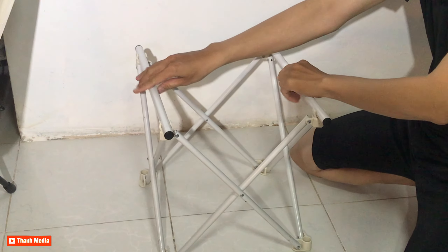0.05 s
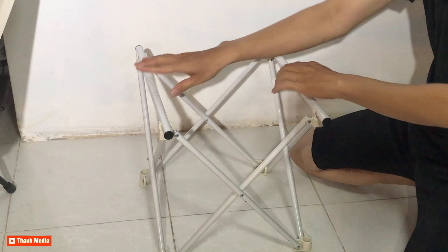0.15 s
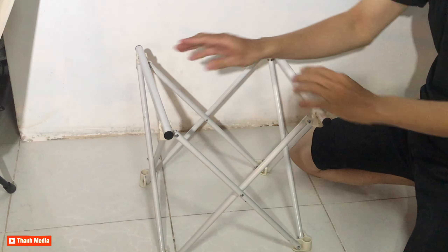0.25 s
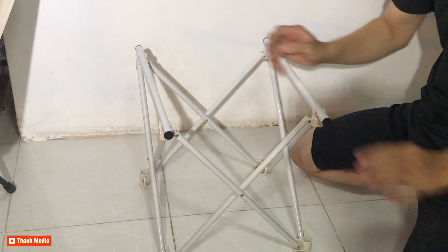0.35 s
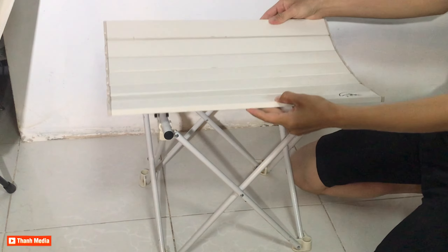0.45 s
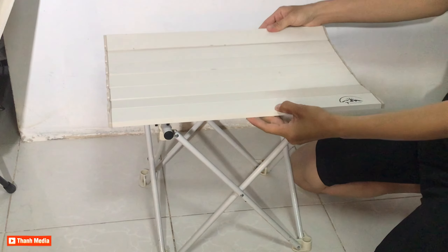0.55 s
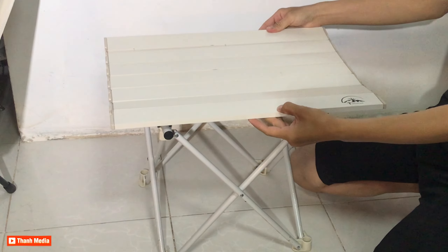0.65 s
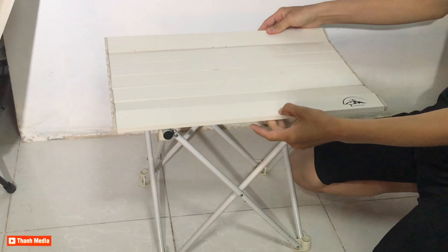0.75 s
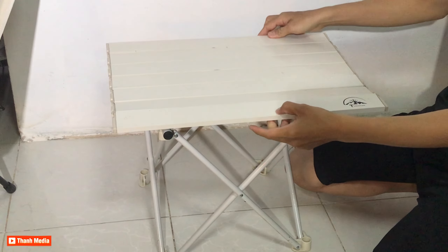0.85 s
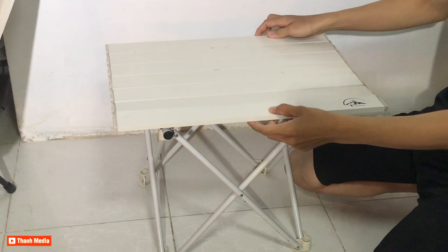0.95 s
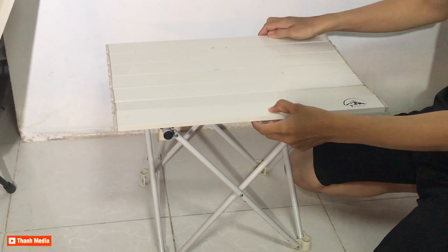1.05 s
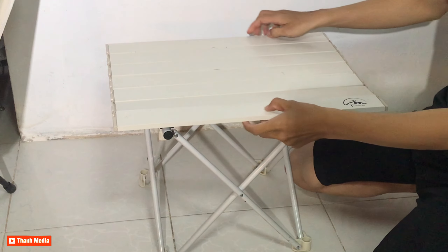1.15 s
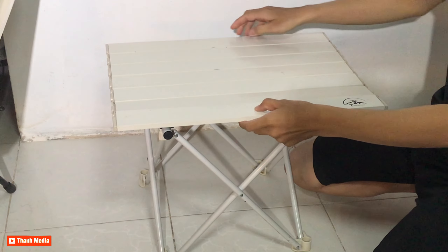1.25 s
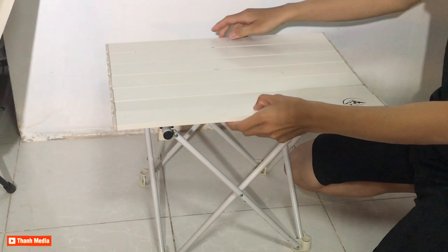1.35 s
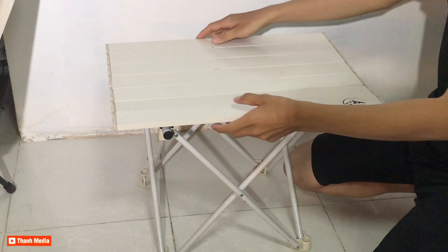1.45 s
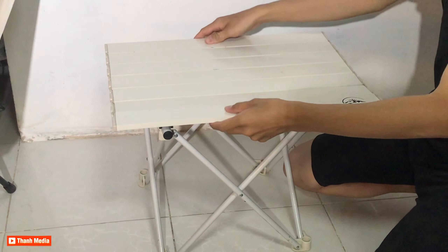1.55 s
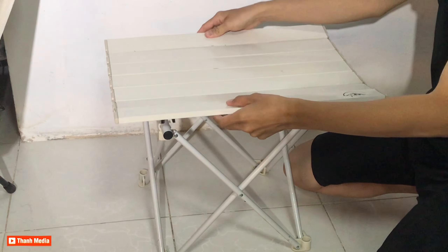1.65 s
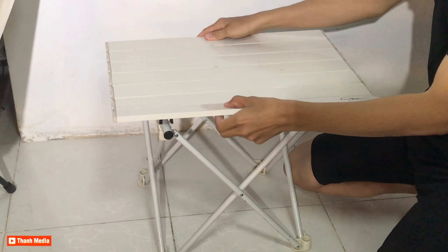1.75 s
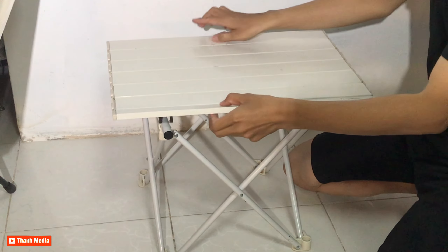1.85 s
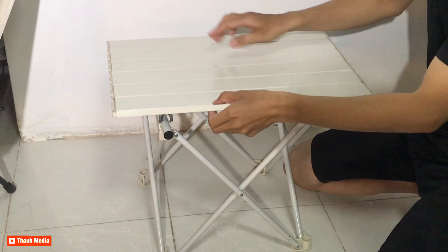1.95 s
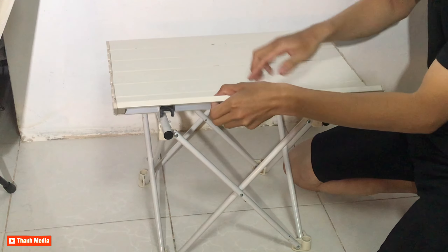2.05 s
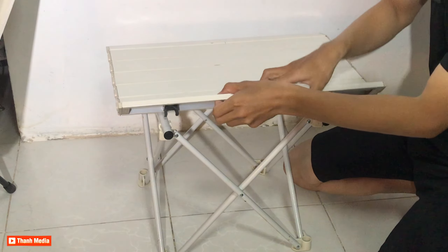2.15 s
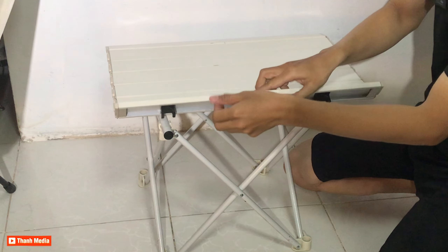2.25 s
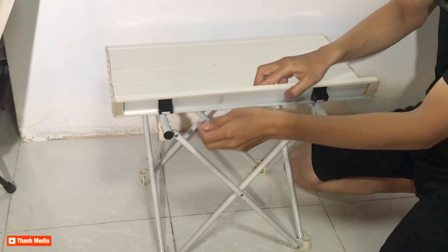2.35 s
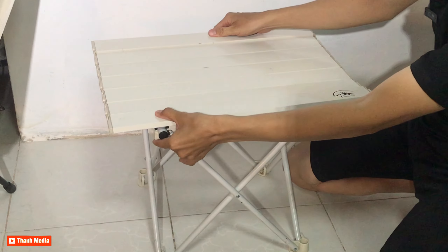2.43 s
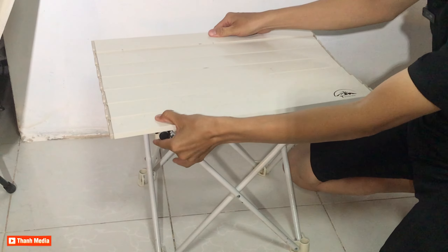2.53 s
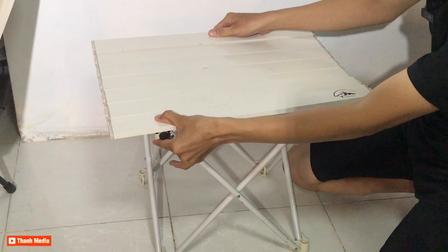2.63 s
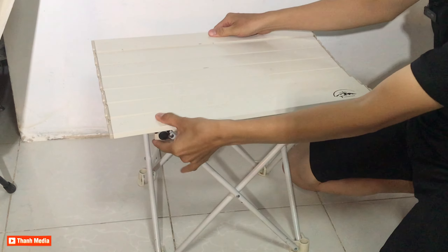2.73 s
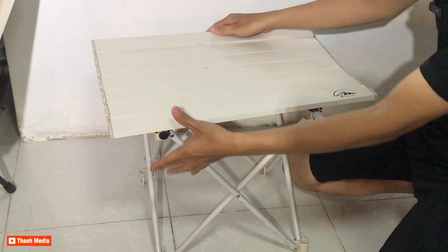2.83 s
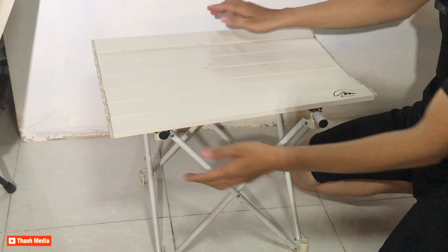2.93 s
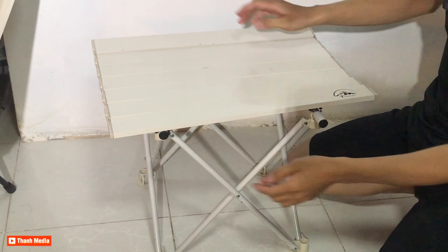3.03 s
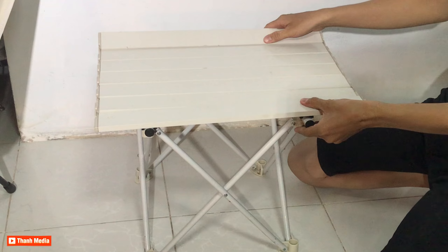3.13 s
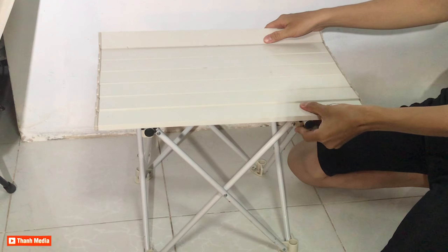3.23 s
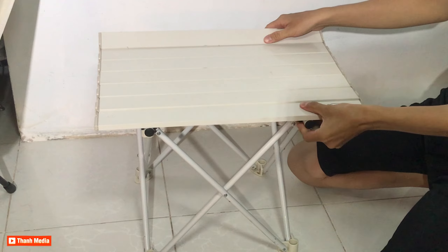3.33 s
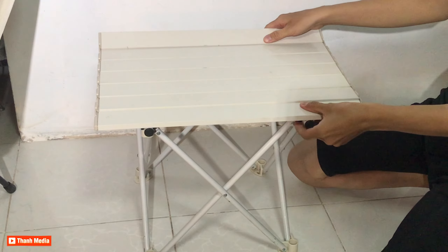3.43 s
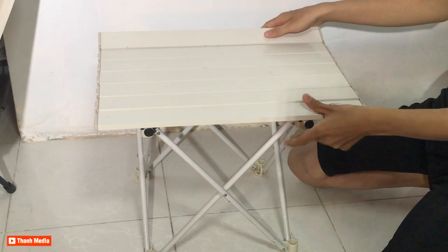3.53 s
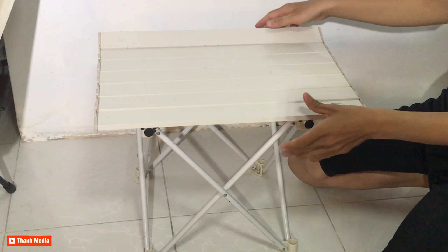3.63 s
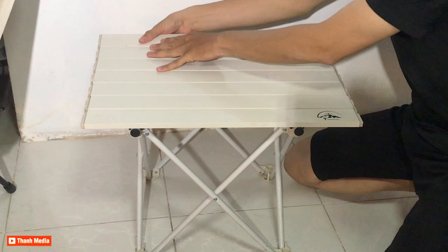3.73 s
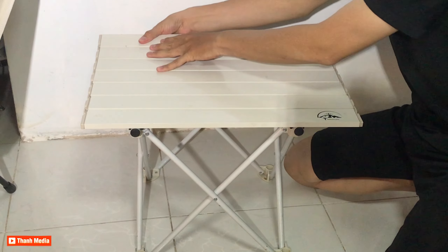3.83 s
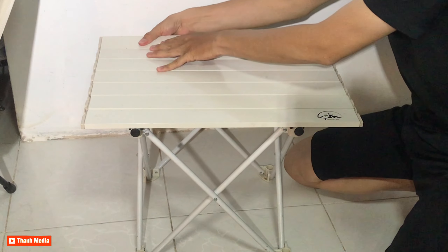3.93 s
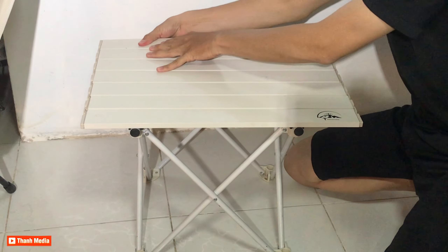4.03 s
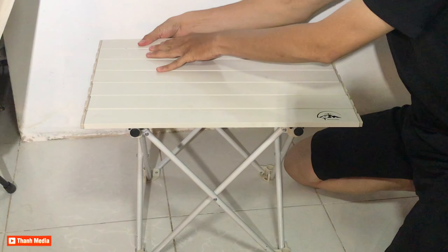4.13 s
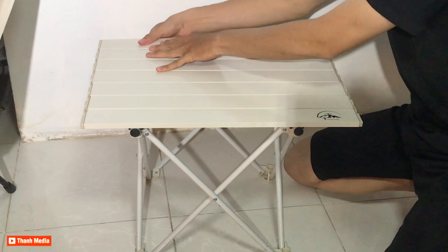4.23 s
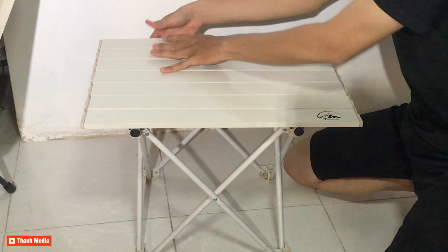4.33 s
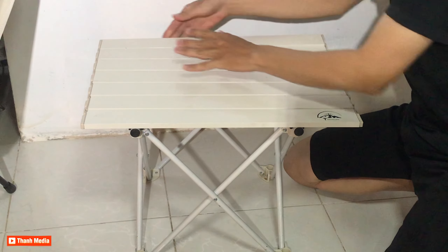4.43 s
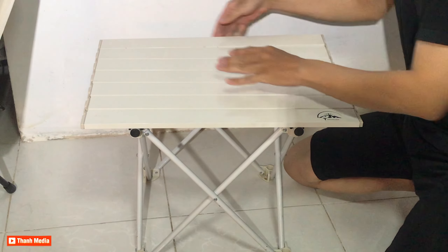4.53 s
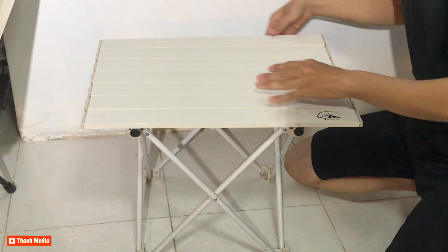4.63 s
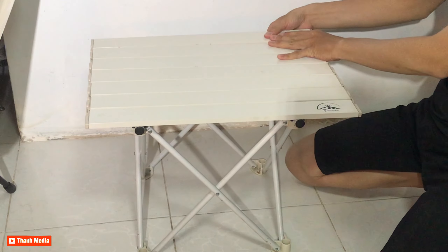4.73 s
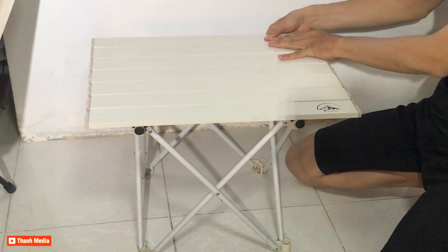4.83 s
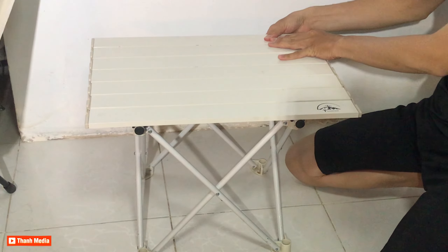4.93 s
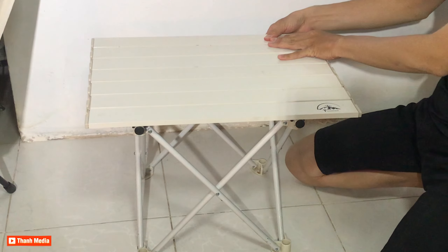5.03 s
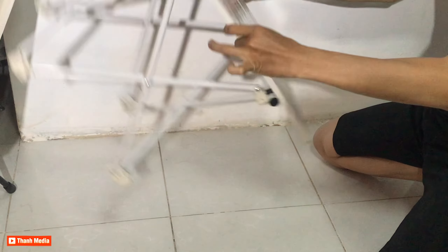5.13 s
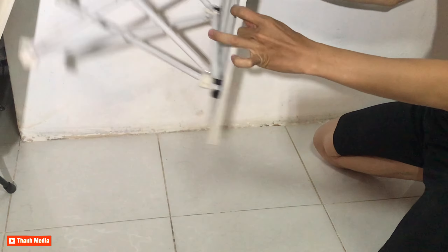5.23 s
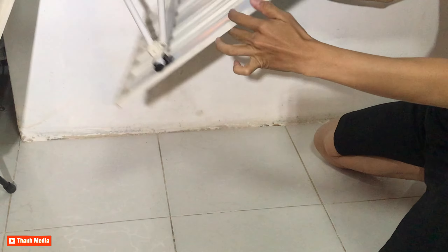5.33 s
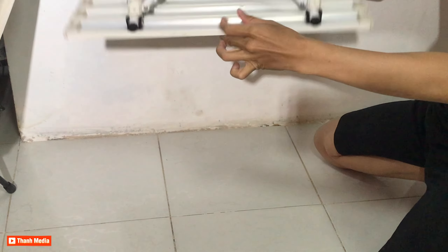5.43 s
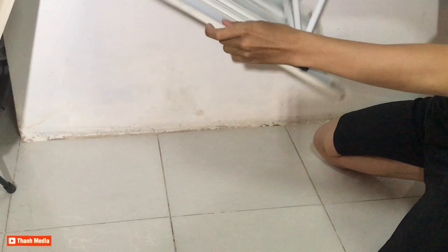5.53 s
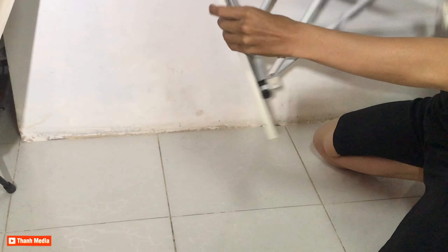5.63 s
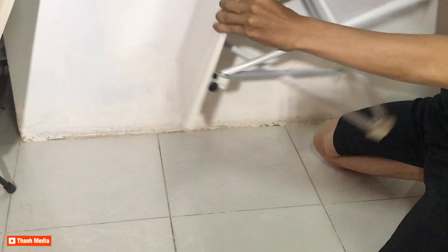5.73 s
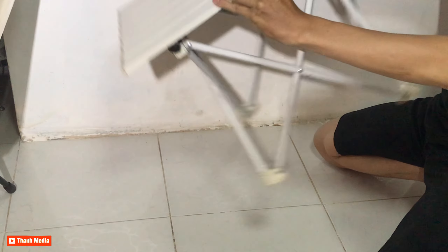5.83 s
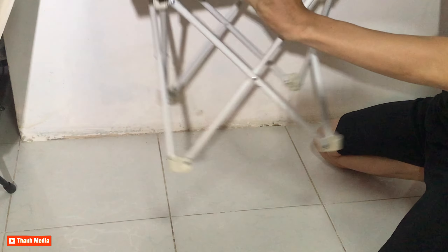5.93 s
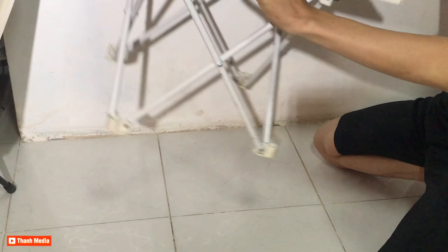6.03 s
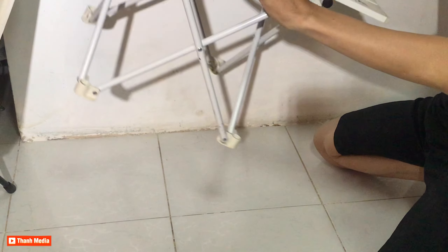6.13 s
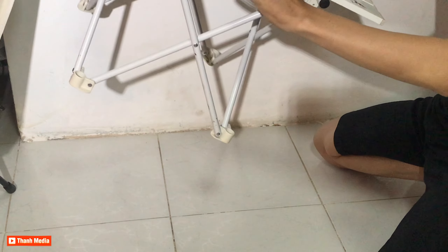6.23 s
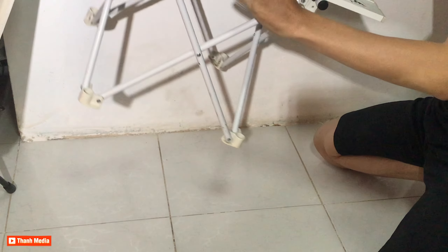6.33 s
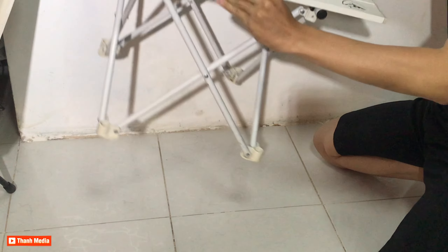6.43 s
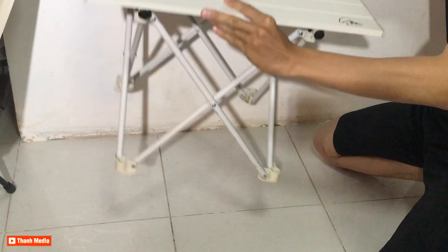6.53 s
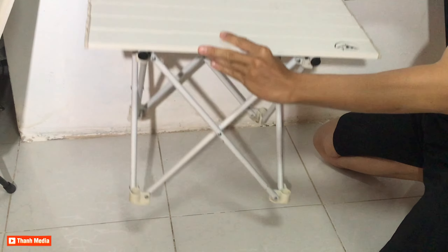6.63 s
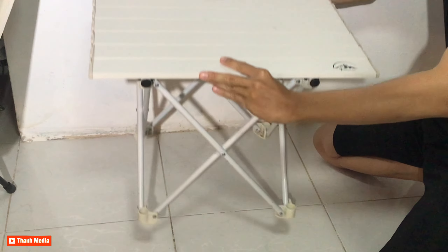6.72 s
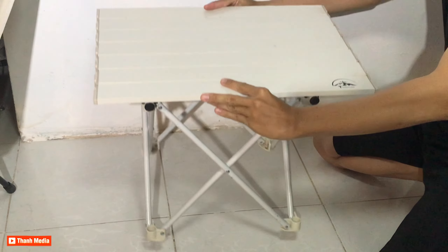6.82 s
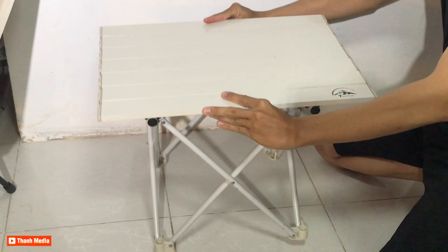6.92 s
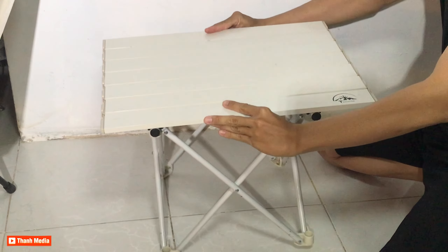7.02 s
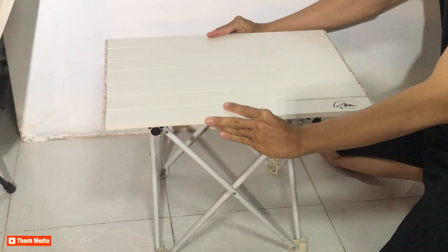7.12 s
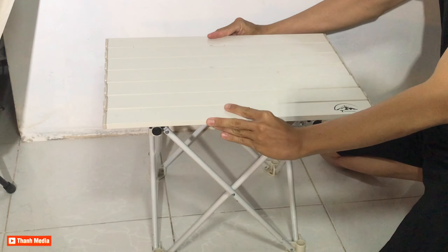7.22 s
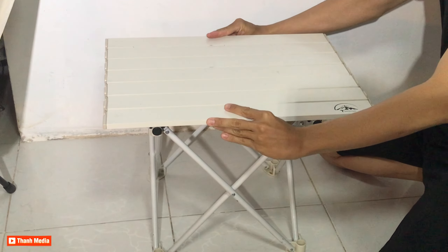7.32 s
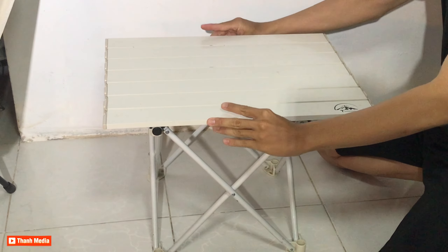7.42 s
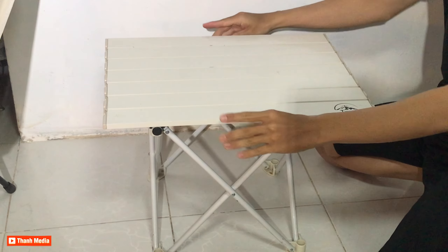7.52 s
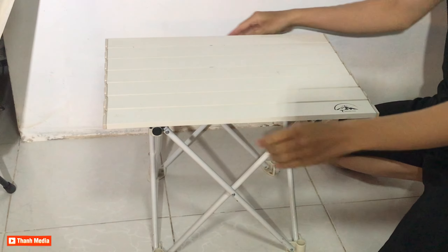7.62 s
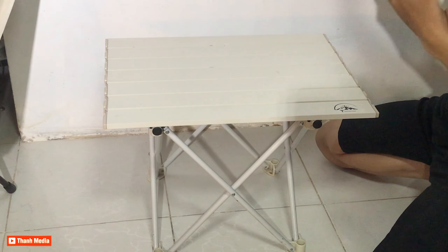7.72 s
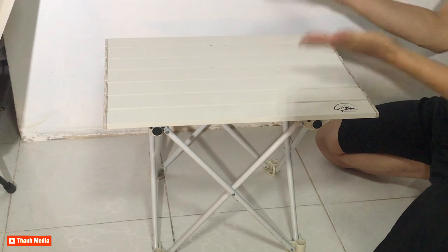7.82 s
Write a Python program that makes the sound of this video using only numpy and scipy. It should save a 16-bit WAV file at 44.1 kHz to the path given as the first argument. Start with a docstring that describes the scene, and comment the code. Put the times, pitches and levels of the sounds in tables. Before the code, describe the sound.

Close up in a small, bare, tiled room, a metal folding table is put together. First comes a quick run of rattling knocks and some sliding as the top lands on the frame. Six sharp, clanking snaps follow at uneven intervals as slats catch in plastic clips. The table is then handled with soft rubbing, taps and thumps, and set down with a short clatter. A faint low hum lies underneath.

```python
"""Camping table on a tiled floor.

A small bare room, one microphone close by. The slatted top of a folding aluminium table is dropped on
its tube frame, shoved about and snapped into four plastic clips; then the table is lifted, turned over
and set back on its feet. Each knock rings the slats and tubes. Hands rub on the top, cloth swishes,
and a low hum fills the room."""
import sys
import numpy as np
from scipy import signal
from scipy.fft import rfft, irfft, next_fast_len
from scipy.io import wavfile

SR = 44100
rng = np.random.default_rng(int(sys.argv[2]) if len(sys.argv) > 2 else 0)


def store_pcm(level_fs):
    """Save levels as 16-bit WAV."""
    pcm = np.round(np.clip(level_fs, -1, 1) * 32767).astype(np.int16)
    wavfile.write(sys.argv[1], SR, np.atleast_2d(pcm).T)


N = 347067
RING_T = np.arange(int(.4 * SR)) / SR  # time axis of one ring, s
EDGES_HZ = np.geomspace(22, 17000, 34)  # bands about a third of an octave wide
CENTRES_HZ = np.sqrt(EDGES_HZ[1:] * EDGES_HZ[:-1])

# Clear modes of the top: f/Hz, level/dB, ring time t60/s, capped at longest_t60
TOP_MODES = [(169, -12, 0.22), (198.5, -8.5, 0.37), (288, -11, 0.075), (290.9, -4, .19), (356.4, -7, 0.23),
             (392, -5.5, 0.074), (525.6, -3, 0.19), (576, -5, 0.26), (700, -8, 0.23), (770, 0, 0.11),
             (878, -4, 0.11), (1009, -2, 0.29), (1112, -1, 0.14), (1238, -10, 0.28), (1464, -15, 0.15),
             (1582, -8.5, 0.38)]
# Top landing on the frame, or feet on the tiles:
# t/s, level/dB, bass thump/dB, treble edge/dB, struck spot f/Hz, bounces, loss per bounce/dB
KNOCKS = [(0.475, -13, -11.5, 1.5, 550, 2, -1.5), (0.521, -13.5, 7, 0, 490, 3, 2.5),
          (0.589, -18.5, -8, -8.5, 1600, 3, 4.5), (0.7371, -20, -0.5, 0.5, 570, 1, 3.5),
          (0.8319, -31, -2, -1, 970, 0, 0), (0.8939, -16, -3.5, -2, 820, 1, 10),
          (1.7093, -16, 4.5, -4, 1240, 2, 0), (1.847, -31, 2, -14, 1660, 0, -3),
          (1.8765, -31.5, -13, -13, 890, 1, 4.5), (2.155, -18, 2.5, -4.5, 700, 2, 0),
          (2.242, -23, 3, -1.5, 1150, 1, 3.5), (2.532, -14, -8.5, -4, 1470, 1, 2),
          (2.587, -18.5, 0, -3.5, 1045, 0, 0), (3.933, -24.5, -1, -1.5, 797, 0, 0),
          (3.959, -17, -1, -1.5, 580, 0, -1.5), (4.835, -19.5, 1, 3.5, 290, 0, 0),
          (5.276, -26.5, 0.5, 0.5, 414, 0, -2.5), (5.756, -20.5, -2, -4.5, 1243, 2, 6.5),
          (7.046, -28, 6.5, -2, 560, 1, -1), (7.066, -25, -1, -4.5, 546, 2, 4.5),
          (7.154, -37.5, 13, -6, 740, 1, -5.5), (7.189, -18, -3.5, -7.5, 780, 4, 2.3)]
# Light, dry taps of fingers and loose joints: t/s, level/dB, bass thump/dB, struck spot f/Hz
TAPS = [(0.709, -35.5, 11, 1595), (1.1944, -39, 3, 1560), (1.318, -50.5, 3, 1484), (1.577, -49.5, 3, 1070),
        (2.012, -43.5, 15, 880), (2.429, -54.5, 1.5, 1444), (2.778, -47.5, 15, 850), (3.003, -47.5, 1, 900),
        (3.164, -45.5, -0.5, 1000), (4.278, -44.5, 4, 720), (5.215, -48.5, 12.5, 423),
        (5.318, -40.5, -15, 2520), (5.354, -46, 13, 1400), (5.518, -47.5, -5, 1000), (5.551, -40, 18, 208),
        (5.583, -43.5, 9, 386), (7.397, -47.5, 9.5, 1460)]
# A slat snaps home on a tube: t/s, level/dB, bass thump/dB, treble edge/dB, frame thud f/Hz, thud/dB,
# slat knock f/Hz, knock/dB, plastic tick/dB, bounce gap/s, loss per bounce/dB
SNAPS = [(1.7535, -11, -16, -8, 208, -26, 1403, -12, -21.5, 0.013, 15),
         (2.2062, -15, -6.5, -7, 330, -47.5, 808, -12, -36, .012, 10.5),
         (2.5176, -6.5, -4, 2, 377, -8.5, 790, -9.5, -20.5, .012, 10.5),
         (3.204, -6.5, 4, -1, 278, -8, 733, -3.5, -17.5, 0.0076, 3.5),
         (4.0075, -6.5, -2.5, -1, 381, -6.5, 900, -6.5, -19.5, .006, 7),
         (4.847, -10.5, 0, -1, 298, -11.5, 778, -8.5, -27.5, .009, 5)]


def from_db(db):
    """Decibels to gain."""
    return 10 ** (np.asarray(db) / 20)


def rms_one(x):
    """Scale to rms 1."""
    return x / np.sqrt(np.mean(x ** 2) + 1e-20)


def at_hz(points, hz):
    """Read a table on a log-frequency axis."""
    f, value = np.transpose(points)
    return np.interp(np.log(hz), np.log(f), value)


def coloured(x, spectrum):
    """Give a steady signal a spectrum; rms 1."""
    size = next_fast_len(N)
    hz = np.maximum(np.fft.rfftfreq(size, 1 / SR), 1)
    return rms_one(irfft(rfft(x, size) * from_db(at_hz(spectrum, hz)), size)[:N])


def drift(per_s, size=N):
    """A random wander: straight lines between values of spread 1."""
    knots = rng.standard_normal(4096)
    return np.interp(np.arange(size) / SR * per_s, np.arange(len(knots)), knots)


def resonance(x, hz, width_hz):
    """One resonance with gain 1 at its peak."""
    r = np.exp(-np.pi * width_hz / SR)
    feedback = [1, -2 * r * np.cos(2 * np.pi * hz / SR), r * r]
    return signal.lfilter(np.array([1, 0, -1]) * (1 - r * r) / 2, feedback, x + 1e-18)


def room_tone(air_db=-53, hum_db=-59, hum_hz=152.7, wavers_per_s=10):
    """The room by itself: low rumble, faint hiss and a wavering hum."""
    # Still air of the room: f/Hz, relative density/dB
    air_spectrum = [(20, -8), (32, -2), (45, 8.5), (62, -5.5), (80, -4), (120, -4.5), (200, -9),
                    (290, -13.5), (400, -13), (600, -19.5), (1000, -25.5), (1900, -38.5), (2700, -35),
                    (4000, -39), (15500, -45)]
    air = coloured(rng.standard_normal(N), air_spectrum)
    waver = 1 + .5 * (drift(wavers_per_s) + 1j * drift(wavers_per_s))
    hum = np.real(waver * np.exp(2j * np.pi * hum_hz * np.arange(N) / SR))
    return from_db(air_db) * air + from_db(hum_db) * rms_one(hum)


def rubbing_effort(resting_db=-72, rise_db_per_s=224.5, fall_db_per_s=169.5):
    """Each stroke swells, holds and dies away, over the faint rub of resting hands."""
    # Shoves of the top and strokes of the hands: t/s, hold/s, level/dB
    strokes = [(.61, 0.12, -41.5), (.8, 0.12, -42.5), (1.242, 0.1, -52), (1.599, .06, -50.5),
               (1.69, 0.083, -37), (2.05, .07, -44.5), (2.178, 0.066, -31), (2.8, 0.053, -53.5),
               (3.52, 0.02, -56.5), (4.31, 0.018, -57), (5.14, 0.13, -62.5), (5.45, 0.34, -63),
               (5.33, 0.14, -53.5), (5.88, 0.027, -54), (7.085, .02, -48), (7.21, 0.017, -39)]
    t, gain = np.arange(N) / SR, from_db(resting_db)
    for s, hold_s, level_db in strokes:
        early, late = np.maximum(s - t, 0), np.maximum(t - s - hold_s, 0)
        gain = np.maximum(gain, from_db(level_db - rise_db_per_s * early - fall_db_per_s * late))
    return gain


def in_room(x, t60=0.45):
    """Reflections off tiles and bare walls smear a soft sound."""
    reflections = rng.standard_normal(len(RING_T)) * np.exp(-np.log(1000) * RING_T / t60)
    return signal.fftconvolve(x, reflections)[:N]


def sliding(rub_db=-2, uneven_db=9.0, slips_per_s=70, mode_width_hz=28):
    """Friction catches and slips, softly stirring the modes of the top."""
    # Friction on the slats: f/Hz, relative gain/dB
    rub_spectrum = [(200, -9.5), (500, 3.5), (1000, 2.5), (1600, -3), (2100, -12.5), (2750, -10),
                    (3700, -20), (6000, -18), (8000, -27.5), (12000, -38.5)]
    friction = in_room(rng.standard_normal(N) * from_db(uneven_db * drift(slips_per_s)))
    stirred = sum(resonance(friction, hz, mode_width_hz) for hz, *_ in TOP_MODES)
    return from_db(rub_db) * rubbing_effort() * coloured(friction + stirred, rub_spectrum)


def frame(x, bend_hz=130):
    """The hollow tubes lend their clank; the light top radiates little below its lowest bending mode."""
    # Broad resonances of the tubes: f/Hz, width/Hz, level/dB
    tubes = [(1488, 14, -7.5), (1674, 59, -10), (1928, 12, -8), (2246, 53, -3.5), (2516, 83, 0.5),
             (2697, 130, 6), (2960, 60, -4.5), (3830, 70, -8), (4610, 320, -3), (5580, 140, -4.5),
             (5350, 82, -2), (7180, 220, 2.5), (8220, 300, -1.5)]
    x = signal.sosfilt(signal.butter(3, bend_hz, "high", fs=SR, output="sos"), x)
    return x + sum(from_db(level_db) * resonance(x, hz, width_hz) for hz, width_hz, level_db in tubes)


def cloth(swish_hz=6300, width_hz=2400, length_s=0.01):
    """Cloth gives short, thin swishes as the arms move."""
    # Swishes: t/s, level/dB
    swishes = [(.43, -65), (2.09, -69), (6.53, -75), (6.64, -71), (6.96, -75), (7.679, -69)]
    t = np.arange(N) / SR
    hiss = resonance(resonance(rng.standard_normal(N), swish_hz, width_hz), swish_hz, width_hz)
    swells = sum(from_db(level_db) * np.exp(-((t - s) / length_s) ** 2) for s, level_db in swishes)
    return rms_one(hiss) * swells


def bouncing(s, level_db, colour, gap_s, loss_db, count, scatter=.14):
    """A contact and its unevenly spaced bounces; with a negative loss they grow louder."""
    order = np.arange(int(round(count)) + 1)
    late = scatter * rng.standard_normal(len(order)) * (order > 0)
    return [(s + gap_s * (i + late[i]), level_db - loss_db * i, *colour) for i in order]


def contacts(tap_edge_db=-7.5):
    """Every tap, knock, snap and bounce: t/s, level/dB, bass thump/dB, treble edge/dB, spot f/Hz."""
    rows = [(s, level_db, thump_db, tap_edge_db, spot_hz) for s, level_db, thump_db, spot_hz in TAPS]
    for s, level_db, *colour, count, loss_db in KNOCKS:
        rows += bouncing(s, level_db, colour, gap_s=.0145, loss_db=loss_db, count=count)
    for s, level_db, thump_db, edge_db, thud_hz, *_, gap_s, loss_db in SNAPS:
        rows += bouncing(s, level_db, (thump_db, edge_db, thud_hz), gap_s, loss_db, count=2)
    return rows


def contact_colour(hz, thump_db, edge_db, spot_hz, spot_db=6.0, spot_octaves=0.079):
    """A heavy push adds bass, a hard edge adds treble, and the struck spot favours a few modes."""
    bass_db = thump_db / (1 + (hz / 430) ** 4)
    treble_db = edge_db / (1 + (2600 / hz) ** 2)
    spot = np.exp(-(np.log2(hz / spot_hz) / spot_octaves) ** 2)
    return from_db(bass_db + treble_db + spot_db * spot)


def clatter(colour, filters, body, shared=.65, crack_s=.0062, tail_db=-4.0, chatter_db=2.5):
    """One blow on the crowded modes: a short crack, then a tail in which loose slats chatter."""
    # Crowded modes of slats and tubes: f/Hz, relative density/dB
    slat_spectrum = [(90, -27.5), (190, -10.5), (400, -5.5), (750, 3.5), (1100, 0.5), (1600, -3),
                     (2050, -20), (2700, -10.5), (3700, -21), (5200, -18.5), (8200, -31), (10500, -42),
                     (15000, -43.5)]
    # How long they hang on in the room: f/Hz, t60/s
    hang_times = [(200, 0.12), (500, 0.22), (1100, 0.27), (2100, 0.27), (2750, 0.29), (3700, 0.28),
                  (6000, 0.28), (14000, 0.085)]
    shares = from_db(at_hz(slat_spectrum, CENTRES_HZ)) * np.sqrt(np.diff(EDGES_HZ))
    gains = shares / np.linalg.norm(shares) * colour
    # every blow shares part of its fine ring with all the others
    noise = np.sqrt(shared) * body + np.sqrt(1 - shared) * rng.standard_normal(body.shape)
    noise *= from_db(chatter_db * drift(per_s=260, size=len(RING_T)))
    out = np.zeros(len(RING_T))
    for k, (hz, t60) in enumerate(zip(CENTRES_HZ, at_hz(hang_times, CENTRES_HZ))):
        if hz > 70:
            quick = (hz / 1000) ** 0.083  # the crack is shorter and taller in the treble
            crack = np.sqrt(quick) * np.exp(-RING_T * quick / crack_s)
            tail = from_db(tail_db) * np.exp(-np.log(1000) * RING_T / t60)
            out += gains[k] * rms_one(signal.sosfilt(filters[k], noise[k % 2] * (crack + tail)))
    return out


def struck_table(clatter_db=-19.5, ring_db=-15.5, spread_db=5.0, onset_s=0.0043, longest_t60=.28):
    """Each contact rings the same body; the modes quickly lose their first strength, then fade."""
    filters = [signal.butter(2, band, "band", fs=SR, output="sos") for band in zip(EDGES_HZ, EDGES_HZ[1:])]
    hz, mode_db, t60 = np.transpose(TOP_MODES)
    t60 = np.minimum(t60, longest_t60)  # no mode rings longer than longest_t60
    fade = np.exp(-np.log(1000) * RING_T / t60[:, None]) + 0.65 * np.exp(-RING_T / onset_s)
    rings = np.sin(2 * np.pi * hz[:, None] * RING_T) * fade
    body = rng.standard_normal((2, len(RING_T)))  # neighbouring bands get different noise
    out = np.zeros(N + len(RING_T))
    for s, level_db, *contact in contacts():
        strength = from_db(ring_db + mode_db + spread_db * rng.standard_normal(len(hz)))
        polarity = rng.choice([-1, 1], len(hz))
        clear = (strength * polarity * contact_colour(hz, *contact)) @ rings
        crowded = from_db(clatter_db) * clatter(contact_colour(CENTRES_HZ, *contact), filters, body)
        start = int(s * SR)
        out[start:start + len(RING_T)] += from_db(level_db) * (clear + crowded)
    return out[:N]


def thuds(tap_offset_db=2.5, knock_offset_db=-3, swell_cycles=0.99, hollow_db=-13, hollow_s=.024):
    """The damped first push of a contact swells and dies in a few cycles, leaving a short hollow ring."""
    # Dull bumps as the table is carried and set down: t/s, level/dB, f/Hz
    bumps = [(5.549, -58, 174), (6.144, -40.5, 134.7), (6.196, -43.5, 89.6), (6.219, -38, 191.6),
             (6.401, -48, 74), (7.191, -36.5, 93), (7.199, -33, 160)]
    pushes = bumps + [(s, level_db + tap_offset_db, hz) for s, level_db, _, hz in TAPS]
    pushes += [(s, level_db + knock_offset_db, hz) for s, level_db, _, _, hz, *_ in KNOCKS]
    for s, _, _, _, thud_hz, thud_db, knock_hz, knock_db, *_ in SNAPS:
        pushes += [(s, thud_db, thud_hz), (s, knock_db, knock_hz)]
    out = np.zeros(N)
    for s, level_db, hz in pushes:
        start, age = int(s * SR), RING_T * hz / swell_cycles
        swell = age * np.exp(1 - age)
        hollow = from_db(hollow_db) * (1 - np.exp(-age)) * np.exp(-RING_T / hollow_s)
        tone = np.sin(2 * np.pi * hz * RING_T)
        out[start:start + len(tone)] += from_db(level_db) * tone * (swell + hollow)
    return out


def clip_ticks(tick_s=0.001, band_hz=(4200, 10500)):
    """The catching edge of a plastic clip lets go within a millisecond or two: all treble."""
    out = np.zeros(N)
    for s, *_, tick_db, _, _ in SNAPS:
        start = int(s * SR)
        tick = rng.standard_normal(len(RING_T)) * np.exp(-RING_T / tick_s)
        out[start:start + len(tick)] += from_db(tick_db) * tick
    return signal.sosfilt(signal.butter(2, band_hz, "band", fs=SR, output="sos"), out + 1e-18)


def scene():
    """Table, cloth and room all reach one nearby microphone."""
    metal = frame(struck_table() + clip_ticks() + sliding())
    return (metal + thuds() + cloth() + room_tone())[None]


def record(dry, cutoff_hz=15550):
    """The hardest snaps just overload the recorder, and the highest treble is cut."""
    overloaded = dry / (1 + dry ** 6) ** (1 / 6)
    lowpass = signal.ellip(10, .1, 80, cutoff_hz, fs=SR, output="sos")
    return signal.sosfilt(lowpass, overloaded)


dry = scene()
out = record(dry)
store_pcm(out)
```